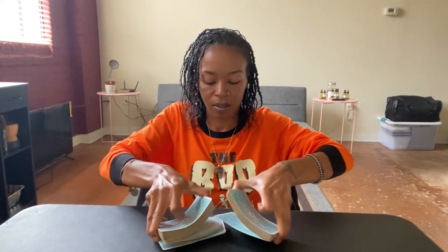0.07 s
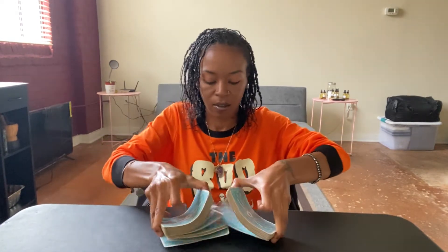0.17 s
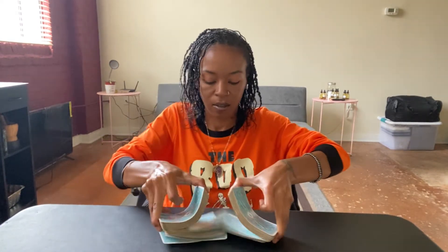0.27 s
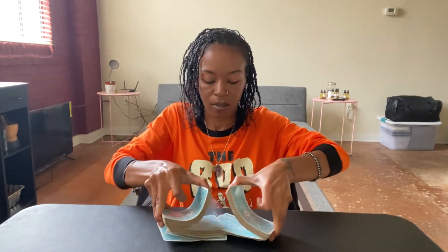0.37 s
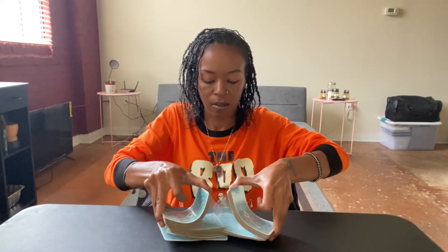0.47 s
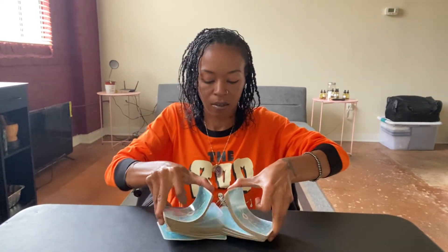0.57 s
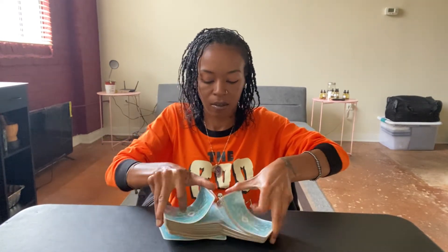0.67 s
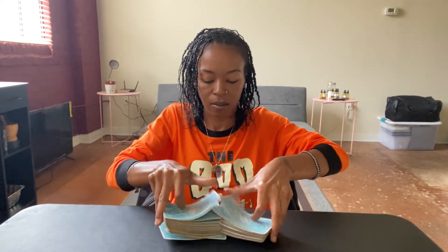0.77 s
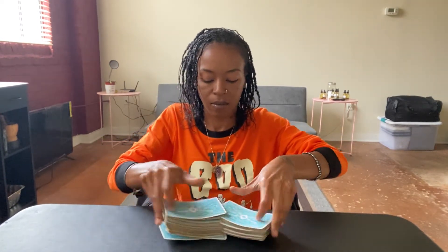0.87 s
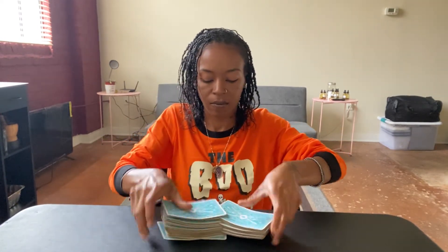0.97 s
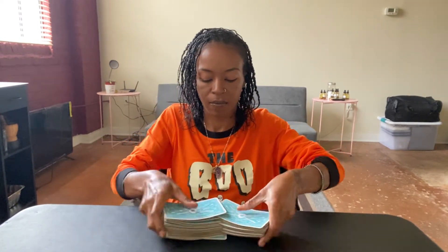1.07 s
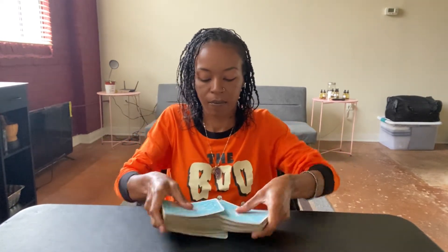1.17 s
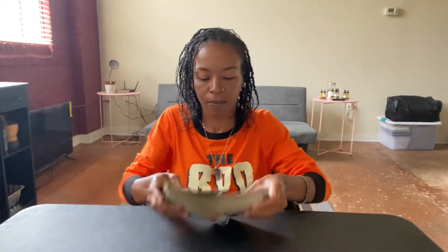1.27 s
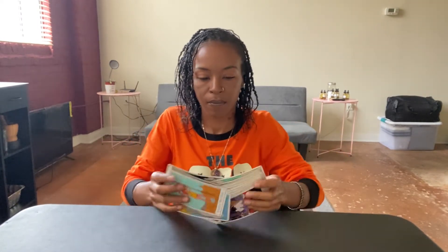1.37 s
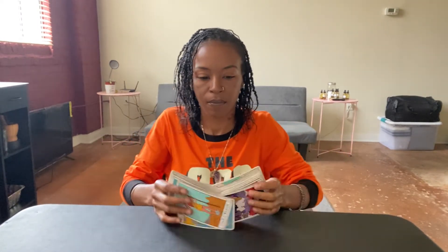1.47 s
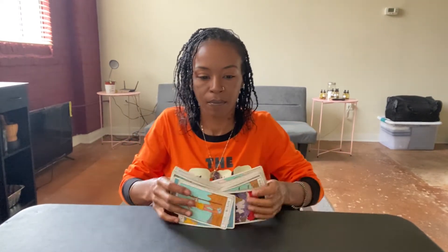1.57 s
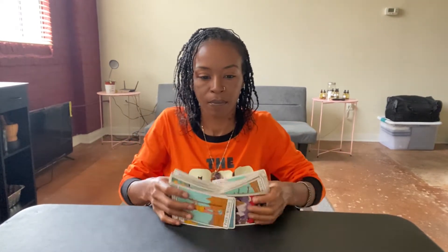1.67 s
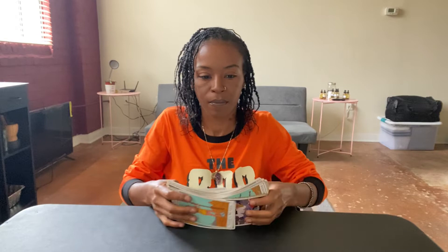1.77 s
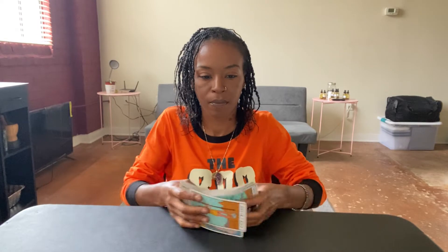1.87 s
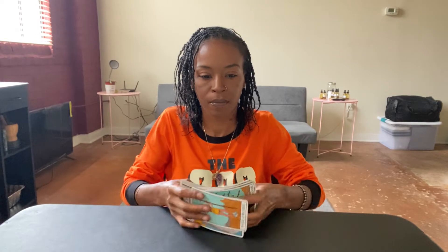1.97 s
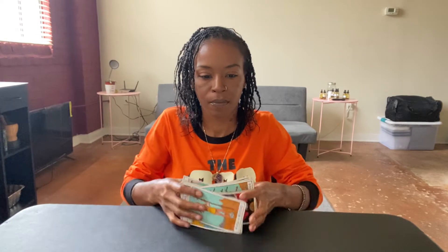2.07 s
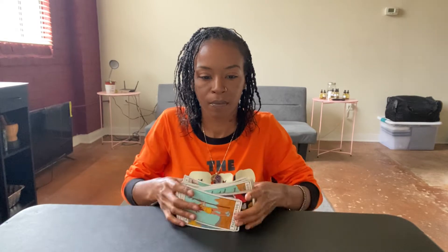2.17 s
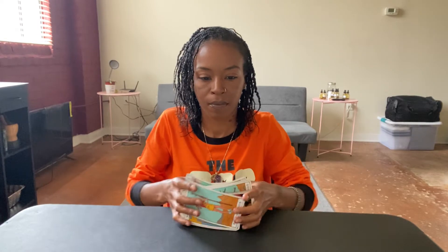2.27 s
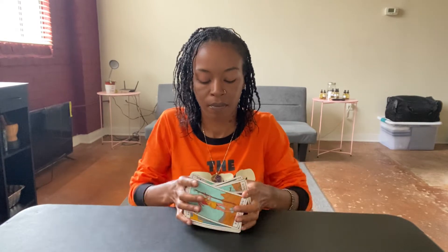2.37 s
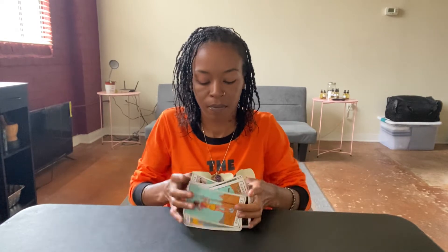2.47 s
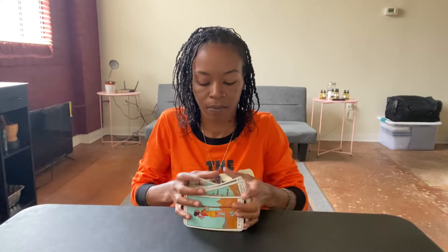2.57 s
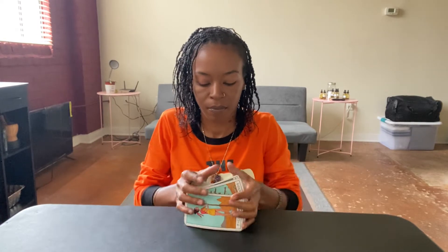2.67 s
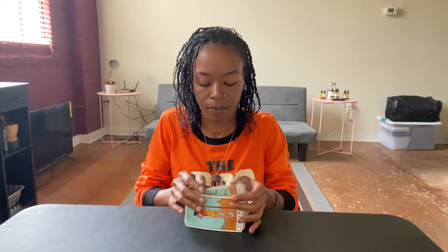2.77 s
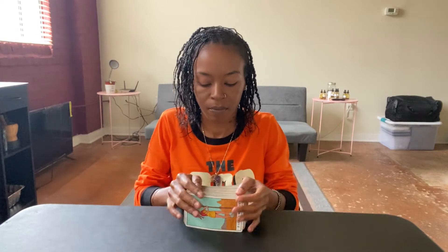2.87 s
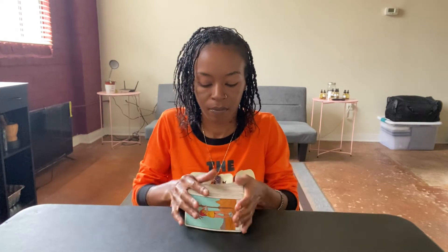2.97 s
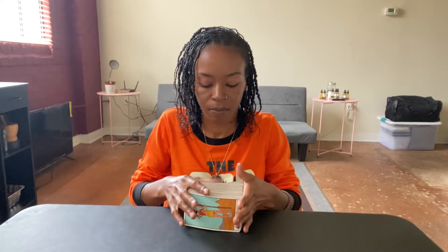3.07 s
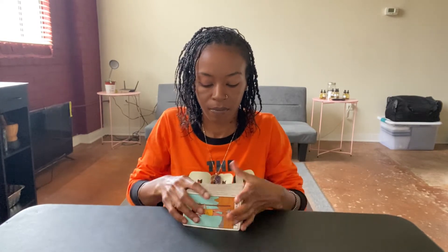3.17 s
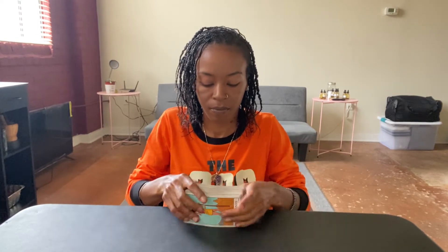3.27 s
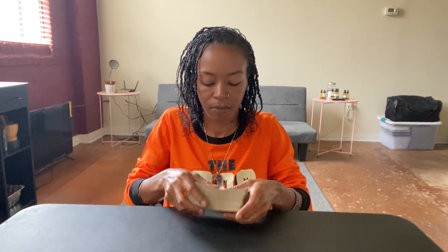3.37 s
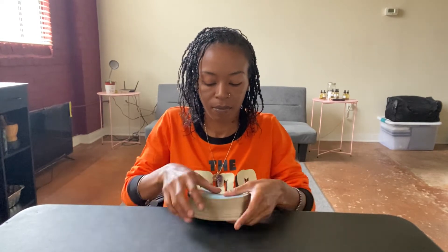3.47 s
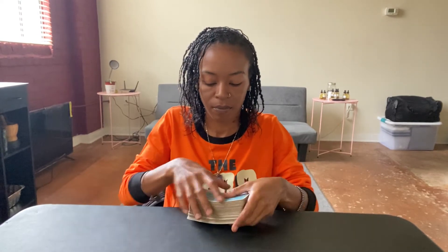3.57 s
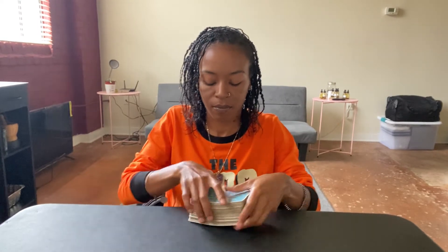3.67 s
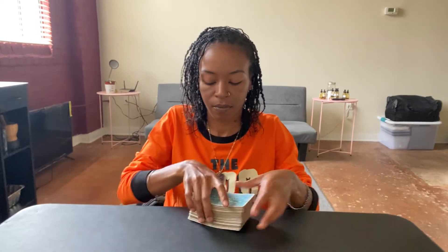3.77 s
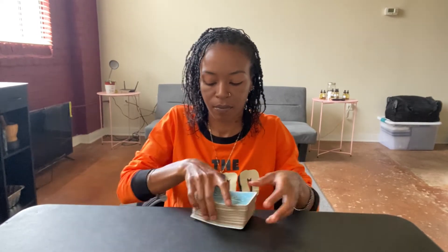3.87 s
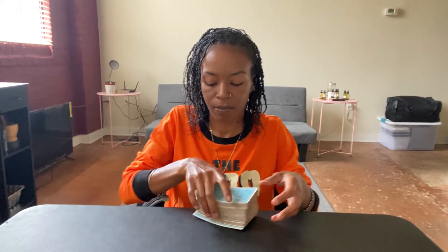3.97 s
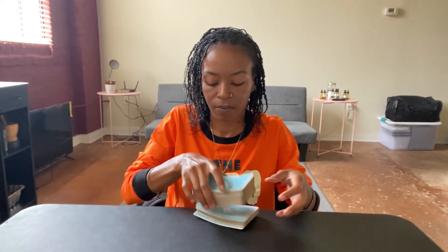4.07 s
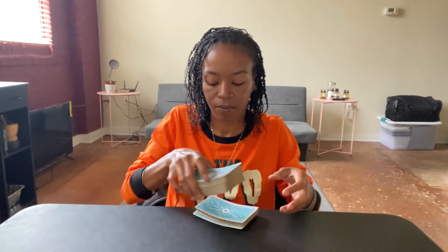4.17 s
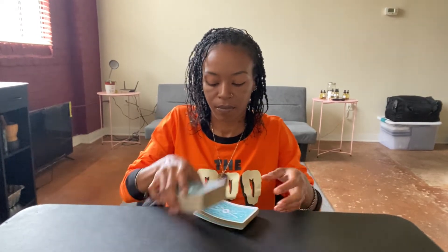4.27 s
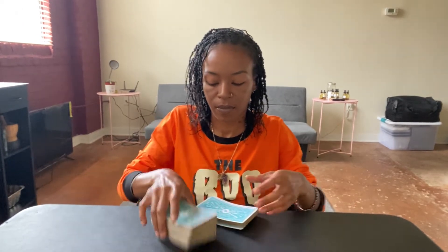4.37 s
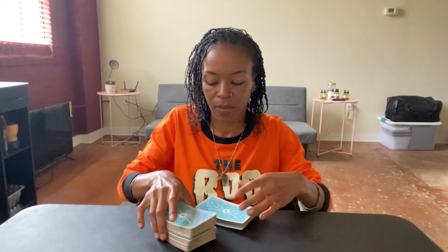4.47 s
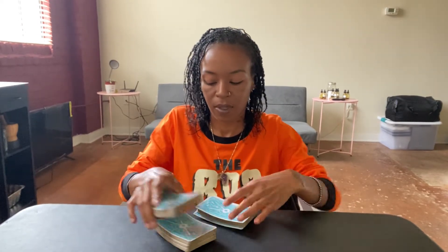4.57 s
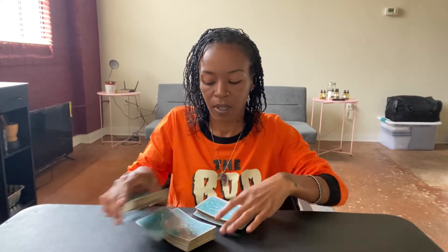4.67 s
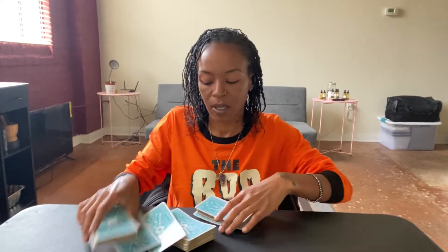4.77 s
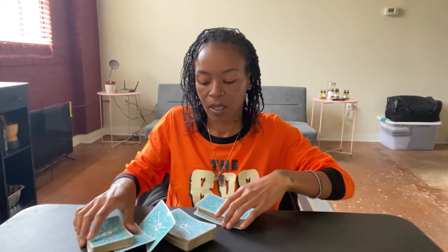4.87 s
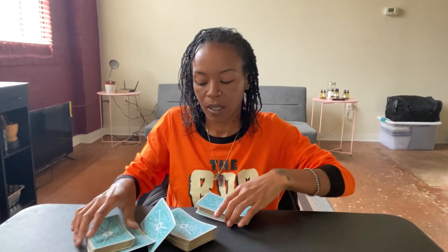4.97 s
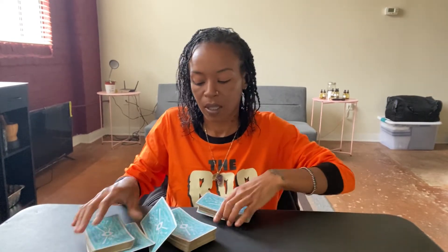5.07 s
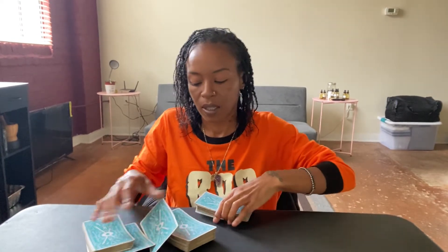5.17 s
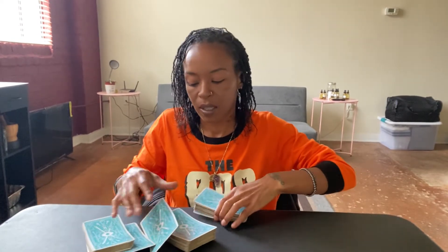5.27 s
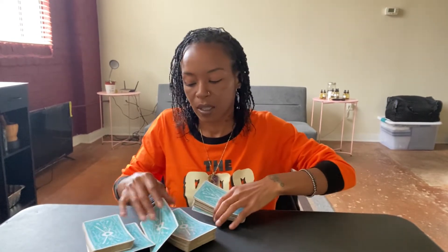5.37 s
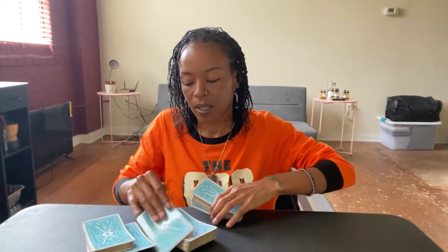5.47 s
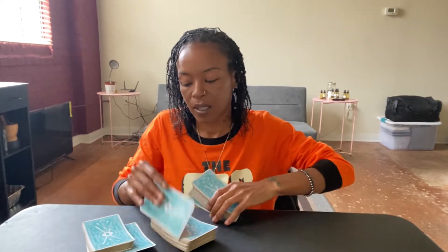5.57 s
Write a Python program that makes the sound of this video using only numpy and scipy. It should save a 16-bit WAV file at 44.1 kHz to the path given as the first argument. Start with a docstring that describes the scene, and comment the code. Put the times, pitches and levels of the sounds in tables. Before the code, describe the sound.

A close, crisp card riffle ends in a thud, followed by clustered woody deck taps, faint sliding and a few soft pile drops.

```python
"""Stiff cards are riffled onto a padded folding table, pushed together on edge, then cut into piles.
Each snap sums a decaying resonance of the half-closed deck's air pocket near 1 kHz with noise bursts
for the flexing cards and cracking edges; sliding is noise broken into slips, shaped by the same parts.
Pushes ring the modes of the table top. A bare room answers with decaying noise tails, over room noise
and a low motor hum, all heard by a small pair of microphones on the table."""
import sys
import numpy as np
from scipy import signal
from scipy.fft import rfft, irfft
from scipy.io import wavfile
from scipy.ndimage import uniform_filter1d

SR = 44100
rng = np.random.default_rng(int(sys.argv[2]) if len(sys.argv) > 2 else 0)


def store_wav(level_fs):
    """Save 16-bit WAV to argv[1]."""
    pcm = np.round(np.clip(np.atleast_2d(level_fs), -1, 1) * 32767)
    wavfile.write(sys.argv[1], SR, pcm.T.astype(np.int16))


def to_linear_factor(level_db):
    """Convert decibel levels (scalar or array-like) to linear amplitude factors."""
    exponent = np.asarray(level_db, float) / 20
    return 10 ** exponent


N = 247266
HZ = np.fft.rfftfreq(N, 1 / SR)

# Spectrum of the room noise. Each row: frequency in Hz, relative level in dB.
AIR_SPECTRUM = [(36, 13.5), (58, -4), (95, 8.5), (206, -7), (480, -8.5), (1960, -36), (6600, -42.5),
                (11600, -36.5), (14000, -47.5)]
# Decay of the room. Each row: frequency in Hz, time to fall 60 dB in seconds.
ROOM_DECAY = [(100, 0.3), (260, 0.63), (700, 0.79), (1840, 0.9), (4850, 0.95), (12000, 0.39)]
# Diffuse sound at the two ports. Each row: frequency in Hz, left-right likeness from 0 to 1.
DIFFUSE_LIKENESS = [(200, 0.57), (500, 0.04)]
# Phase between the ports. Each row: frequency in Hz, lead of the left port in radians.
PORT_LEAD = [(0, 0), (3000, -.7), (5200, -2.4), (7900, 0), (10550, np.pi), (13050, 2 * np.pi),
             (15200, 3 * np.pi)]
# Balance of the ports. Each row: frequency in Hz, left minus right in dB.
PORT_BALANCE = [(2500, 1.4), (5000, -0.9)]
# Modes of the table top. Each row: frequency in Hz, relative level in dB,
# time to fall 60 dB in seconds before any further damping.
TABLE_MODES = [(74.5, 8, 0.083), (107.8, 0, 0.12), (131.1, -2, 0.13), (153.1, -5, 0.4), (184.4, 0, 0.077),
               (235, -5.5, 0.026), (358.8, -6, 0.57), (420, 1.5, 0.087), (476.4, -2, 0.079),
               (546.3, -7, 0.19), (769, -6.5, 0.024)]
# Blows of the deck on the table top. Each row: time in seconds, level of the low modes in dB,
# upper modes in dB against that level.
THUMPS = [(1.025, -7, -22), (1.464, -14.5, 6.5), (1.699, -24, 7), (1.766, -40, 6), (2.015, -25, -4.5),
          (2.07, -28.5, -20), (2.128, -27, 10.5), (2.452, -20.5, 8.5), (2.55, -30.5, 12),
          (3.245, -30.5, -4), (3.28, -32, -15.5), (3.328, -41, 11), (3.356, -44.5, 16), (3.433, -44, 7.5),
          (3.499, -29, -13), (4.422, -7.5, -5), (4.709, -23, -49), (4.777, -27, -7), (4.826, -15, -29),
          (4.841, -11.5, -6.5)]
# Resonances of the air pocket. Each row: frequency in Hz, width in Hz, relative level in dB.
POCKET_PEAKS = [(480, 750, 5), (1020, 120, 1.5), (1860, 410, -23.5)]
# Resonances of a scuffed card. Each row: frequency in Hz, width in Hz, relative level in dB.
SCUFF_PEAKS = [(966, 180, -0.5), (1320, 44, -8), (1855, 170, -10), (3200, 110, -31), (4390, 190, -21)]
# Spectrum of thin paper edges. Each row: frequency in Hz, relative level in dB.
EDGE_SPECTRUM = [(1500, 5.5), (4000, -1), (6000, -3.5), (8500, -5.5), (10500, -10), (13000, -13.5),
                 (15000, -22.5), (16500, -38.5)]
# Extra brightness of thin edges in flicks, knocks and the riffle stream.
# Each row: frequency in Hz, gain in dB.
THIN_EDGE = [(8000, -2), (13000, 4.5)]
# Spectrum of whole cards flexing. Each row: frequency in Hz, relative level in dB.
FACE_SPECTRUM = [(900, -3), (1800, 5.5), (2600, -4.5), (3400, -6), (4400, -5.5), (6000, -18),
                 (10000, -47.5)]
# Cards sliding over each other. Each row: start in seconds, length in seconds, level in dB,
# how far the deck is fanned open from 0 to 1.
SLIDES = [(1.039, 0.12, -34, 0.68), (1.446, 0.13, -33, 0.23), (1.715, 0.11, -27, 0.33),
          (1.831, 0.16, -43.5, 0.66), (2.05, 0.14, -36, 0.04), (2.275, 0.094, -36.5, 0.39),
          (2.445, 0.15, -31, 0.36), (2.574, 0.19, -36.5, 0.57), (2.78, 0.096, -43, 0.46),
          (2.916, 0.23, -48.5, 0.37), (3.183, 0.27, -53, 0.76), (3.335, 0.041, -38.5, 0.44),
          (3.652, 0.12, -56, 0.69), (4.407, 0.15, -37.5, 0.26), (4.765, 0.15, -40, 0.73),
          (5.443, 0.39, -58, 0.59)]
# Layers of a slide in a shut and in an open deck: edge hiss, card faces, air pocket, in dB against its level.
SHUT_LAYERS_DB = (-37, -26, 3.3)
OPEN_LAYERS_DB = (9, 0.5, -3)
# Short coloured scuffs, perhaps a card dragged on the vinyl.
# Each row: start in seconds, length in seconds, level in dB.
SCUFFS = [(3.212, 0.043, -41), (3.34, 0.023, -56), (3.653, 0.059, -45.5), (5.561, 0.024, -43)]
# Stream of cards between the thumbs. Each row: time in seconds, level in dB.
RIFFLE = [(0.08, -55.5), (0.158, -59), (0.27, -40.5), (0.345, -65.5), (0.375, -36), (0.5, -38.5),
          (0.54, -35), (0.7, -36), (0.76, -36), (0.86, -70)]
# Layers of the stream: edge hiss, card faces, air pocket, in dB against its level.
STREAM_LAYERS_DB = (-8, -6, -4)
# Cards let go by the thumbs, each falling flat on the pile. Each row: time in seconds,
# level of the pop in dB, crack setting in dB against the pop (snap() raises it).
FLICKS = [(0.105, -25.5, -11.5), (0.154, -28.5, -20), (0.208, -31, -19), (0.233, -43.5, 2.5),
          (0.359, -29.5, -2), (0.375, -34, -6), (0.408, -34.5, -2), (0.433, -25.5, -25.5),
          (0.481, -30.5, -10), (0.509, -16, -18.5), (0.529, -17, -13), (0.597, -15.5, -17),
          (0.602, -15, -14), (0.656, -14.5, -12), (0.664, -17.5, -14), (0.711, -12.5, -16.5),
          (0.744, -22, -25.5)]
# Cards knocked home in the deck. Each row: time in seconds, level of the pop in dB,
# pitch of the air pocket in Hz.
KNOCKS = [(1.461, -32, 776), (1.482, -21.5, 750), (1.645, -19, 870), (1.701, -16.5, 1160),
          (1.701, -13.5, 519), (1.736, -10, 1130), (1.739, -14, 540), (1.74, -8, 1110), (1.768, -23, 950),
          (2.065, -26.5, 990), (2.105, -24.5, 940), (2.131, -22, 950), (2.27, -19.5, 1110),
          (2.291, -12, 1030), (2.407, -12, 1030), (2.441, -19, 1055), (2.457, -9.5, 860),
          (2.463, -13, 1070), (2.467, -3, 1090), (2.494, -20, 1220), (2.523, -16, 960), (2.548, -4, 1120),
          (2.555, -12, 783), (2.578, -14.5, 1133), (2.612, -8, 1050), (2.617, -16, 1000),
          (2.666, -20.5, 1090), (2.677, -14, 1116), (2.695, -20.5, 1180), (2.843, -26.5, 910),
          (2.996, -26.5, 1020), (3.011, -14.5, 1020), (4.421, -18.5, 800), (5.575, -35.5, 1160)]
# Short bright ticks, mostly bare card corners. Each row: time in seconds, reference level in dB,
# lowest strong frequency in Hz.
TICKS = [(0.533, -23, 5000), (0.6, -20, 5000), (0.657, -14, 12100), (0.723, -23, 4200), (0.805, -33, 7000),
         (1.482, -32.5, 1500), (1.699, -24.5, 1780), (2.018, -40.5, 2940), (2.067, -34.5, 1770),
         (2.457, -28, 3200), (2.548, -29, 3400), (2.615, -28.5, 3270), (3.173, -40, 3080),
         (3.497, -46.5, 1985), (4.413, -29, 1210), (4.422, -26, 2000), (4.605, -44, 8600),
         (4.741, -40, 1990), (4.774, -19, 4270), (4.786, -27, 6000), (4.796, -25.5, 1700),
         (4.839, -43.5, 4950), (4.808, -28, 1710)]


def evened(x):
    """Normalization of power: scales to rms 1."""
    return x / np.sqrt(np.mean(x ** 2) + 1e-20)


def peaked(x):
    """Normalization of amplitude: scales to peak 1."""
    return x / (abs(x).max() + 1e-12)


def read(points, hz):
    """Interpolation of a spectrum on a log-frequency axis."""
    f, value = np.transpose(points)
    return np.interp(np.log(hz + 1), np.log(f + 1), value)


def add(mix, s, sound):
    """Superposition: adds a sound to the mix at time s."""
    part = mix[..., round(s * SR):][..., :sound.shape[-1]]
    part += sound[..., :part.shape[-1]]


def coloured(x, points):
    """Linear filtering: multiplies the spectrum of x by a curve held level beyond its end points."""
    gain = to_linear_factor(read(points, np.fft.rfftfreq(x.shape[-1], 1 / SR)))
    return irfft(rfft(x) * gain, x.shape[-1])


def resonated(x, rows):
    """Resonance: filters x by a sum of peaks of given centre, width and level."""
    gain = sum(to_linear_factor(db) / (1 + (2 * (HZ - hz) / width) ** 2) for hz, width, db in rows)
    return irfft(rfft(x) * gain, N)


def paired(x):
    """Spatial coherence: makes two unrelated channels as alike as diffuse sound at the two ports."""
    left, other = rfft(x)
    same = read(DIFFUSE_LIKENESS, HZ)
    return irfft(np.array([left, same * left + np.sqrt(1 - same ** 2) * other]), N)


def slow_drift(samples):
    """Random drift: noise averaged twice over a window, scaled to rms 1."""
    once = uniform_filter1d(rng.standard_normal(N), samples)
    return evened(uniform_filter1d(once, samples))


def background():
    """Stationary noise and a tone: diffuse room noise, and a motor hum whose level wavers a little."""
    air_db, hum_db, hum_hz = -43.5, -36.5, 57.67  # rms levels ahead of the microphones
    air = to_linear_factor(air_db) * evened(paired(coloured(rng.standard_normal((2, N)), AIR_SPECTRUM)))
    hum_level = to_linear_factor(hum_db + 0.67 * slow_drift(6000))
    hum = hum_level * np.sqrt(2) * np.sin(2 * np.pi * (hum_hz * np.arange(N) / SR + rng.random()))
    return air + hum


def room(x):
    """Diffuse reverberation: noise tails build up after the first walls, each band dying at its own speed."""
    half_turns_per_s, first_wall_s, build_s = 9, 0.012, 0.0091
    hz, t, z = signal.stft(rng.standard_normal((3, 2, SR)), SR, nperseg=256)
    decay = to_linear_factor(-60 * t / read(ROOM_DECAY, hz)[:, None])
    z = z * decay * np.clip((t - first_wall_s) / build_s, 0, 1)
    tail = signal.istft(z, SR, nperseg=256)[1]
    tail = tail / np.linalg.norm(tail[0, 0])
    # three random pairs of tails take turns at a steady rate, so no chance peak lingers
    phase = half_turns_per_s * np.arange(N) / SR + np.arange(3)[:, None] / 3
    turn = np.cos(np.pi * phase) * np.sqrt(2 / 3)
    echoes = signal.fftconvolve((turn * x)[:, None], tail, axes=2)[..., :N]
    return paired(echoes.sum(0))


def table_ring(upper):
    """Modal vibration: the modes of the table top above or up to 300 Hz ring and decay after one tick."""
    t = np.arange(SR // 2) / SR
    modes = [row for row in TABLE_MODES if (row[0] > 300) == upper]
    return sum(to_linear_factor(db - 60 * t / t60) * np.sin(2 * np.pi * hz * t) for hz, db, t60 in modes)


def thump(low_ring, upper_ring, push_s):
    """Forced vibration: a padded push rings the low modes, the first contact rings the upper ones."""
    bounce_hz, bounce_start_hz, bounce = 90.3, 278.3, 0.17
    t, noise = np.arange(3000) / SR, rng.standard_normal((3, 3000))
    u = t / push_s
    # air squeezed under the deck: its pitch falls during the push
    pitch = bounce_hz + (bounce_start_hz - bounce_hz) * np.exp(-2 * u)
    squeeze = bounce * np.sin(2 * np.pi * np.cumsum(pitch) / SR)
    padding = signal.butter(3, 380, fs=SR)
    push = signal.lfilter(*padding, (noise[0] + squeeze) * u * np.exp(-u ** 2))
    contact = (noise[0] + 1.07 * noise[1:]) * t * np.exp(-t / 0.0014)
    low = peaked(signal.fftconvolve(push, low_ring))
    upper = peaked(signal.fftconvolve(contact, upper_ring[None], axes=1))
    since_push = np.arange(len(low)) / SR - 3 * push_s
    low = low * np.minimum(1, np.exp(-since_push / 0.061))  # hands damp the top
    return low, upper * np.exp(-np.arange(upper.shape[1]) / SR / 0.11)


def thumps(cards):
    """Impact excitation: the deck's blows, and each released card's fall, ring the table top."""
    push_s, edge_push_s = 0.01966, 0.013  # a deck landing on edge rings the upper modes, pushes briefly
    land_s, land_db, land_upper_db, land_push_s = 0.0051, 3.5, -11, 0.015
    blows = [(*row, edge_push_s if row[2] > 0 else push_s) for row in THUMPS]
    blows += [(s + land_s, db + land_db, land_upper_db, land_push_s) for s, db, _ in cards]
    out = np.zeros((2, N))
    low_ring, upper_ring = table_ring(False), table_ring(True)
    for s, db, upper_db, length in blows:
        low, upper = thump(low_ring, upper_ring, length)
        add(out, s - .004, to_linear_factor(db) * low)
        add(out, s - .001, to_linear_factor(db + upper_db) * upper)
    return out


def riffle_db(s):
    """Envelope of a stream: its level in dB at time s, next to silent outside the riffle."""
    return np.interp(s, *np.transpose(RIFFLE), left=-120, right=-120)


def swell(length):
    """Envelope of a stroke: swells fast, fades slower."""
    return np.sin(np.pi * np.linspace(0, 1, round(length * SR)) ** 0.52) ** 1.23


def rub():
    """Stick-slip friction: three noises share a steady grip broken by small random slips."""
    slips_per_s, spread_db, slip_s, steady_grip = 160, 3.5, .002, 0.92
    sizes = to_linear_factor(spread_db * np.minimum(rng.exponential(1, N), 2))
    slips = sizes * (rng.random(N) < slips_per_s / SR)
    grip = steady_grip + signal.lfilter([1], [1, -np.exp(-1 / (slip_s * SR))], slips)
    return grip * rng.standard_normal((3, N))


def drifting_pocket(sides):
    """Cavity resonance: the pocket's pitch drifts as the gap between the halves changes."""
    wander = .12  # share of the pitch per unit of drift
    ringing = resonated(sides, POCKET_PEAKS)
    # reading at a varying speed bends the pitch
    read_at = np.cumsum(1 + wander * np.clip(slow_drift(1500), -2, 2)) % (N - 1)
    return np.array([np.interp(read_at, np.arange(N), side) for side in ringing])


def slide():
    """Friction-driven radiation: rubbing feeds paper hiss, card faces, air pocket, scuffs and table."""
    stream = to_linear_factor(riffle_db(np.arange(N) / SR) + np.array(STREAM_LAYERS_DB)[:, None])
    pressure, drag = np.zeros((3, N)), np.zeros(N)
    for s, length, db, fanned in SLIDES:
        layers_db = db + np.array(SHUT_LAYERS_DB) + fanned * np.subtract(OPEN_LAYERS_DB, SHUT_LAYERS_DB)
        add(pressure, s, to_linear_factor(layers_db)[:, None] * swell(length))
    for s, length, db in SCUFFS:
        add(drag, s, to_linear_factor(db) * swell(length))
    rubbing = rub()
    sides = rubbing[2] + 2.36 * rubbing[:2]  # left and right share one noise
    both = pressure + stream
    paper = coloured(sides, EDGE_SPECTRUM)
    hiss = pressure[0] * evened(paper) + stream[0] * evened(coloured(paper, THIN_EDGE))
    faces = both[1] * evened(coloured(sides, FACE_SPECTRUM))
    pops = both[2] * evened(drifting_pocket(sides))
    scuffs = drag * evened(resonated(sides, SCUFF_PEAKS))
    ring = table_ring(False)
    rumble = to_linear_factor(-7) * signal.oaconvolve(both[2] * rubbing[2], ring / np.linalg.norm(ring))[:N]
    return hiss + faces + pops + scuffs + rumble


def released():
    """Random arrivals: rows (s, level dB, crack dB) of the loud released cards and a flutter of small ones."""
    flutter_per_s, flutter_db, spread_db, crack_db = 85, 1.5, 5, -10
    start, end = RIFFLE[0][0], RIFFLE[-1][0]
    draw = rng.random((200, 2))
    times = start + np.cumsum(-np.log(1 - draw[:, 0])) / flutter_per_s
    levels = riffle_db(times) + flutter_db + spread_db * draw[:, 1] ** 2
    return FLICKS + [(s, db, crack_db) for s, db in zip(times, levels) if s < end]


def air_pop(t, hz, bounces):
    """Damped resonance: the pocket and its overtone sound for a few cycles with a soft start."""
    overtone, overtone_db = 1.733, -12.5
    pop = t ** 2 * np.exp(-t / .00062) * np.sin(2 * np.pi * hz * t)
    pop = pop + to_linear_factor(overtone_db) * t ** 2 * np.exp(-t / 0.00053) * np.sin(2 * np.pi * overtone * hz * t)
    near, far = bounces
    return peaked(pop - 0.3 * np.roll(pop, near) + 0.2 * np.roll(pop, far))


def snap(db, hz, crack_db, edge, pop_db=0):
    """Impulsive release: a pop of the air pocket, a flex of the cards and a crack of the paper edge."""
    t, noise = np.arange(1024) / SR, rng.standard_normal((2, 3, 1024))
    # bounces off table, hands and chest, in samples
    bounces = (np.array([150, 330]) + 40 * np.clip(noise[0, 0, :2], -2, 2)).astype(int)
    pop = air_pop(t, hz, bounces)
    sides = noise[:, 0] + 1.2 * noise[:, 1:].swapaxes(0, 1)  # not quite the same from left and right
    flex = peaked(coloured(sides[:, 0], FACE_SPECTRUM) * t * np.exp(-t / 0.0025))
    paper = coloured(coloured(sides[:, 1], EDGE_SPECTRUM), edge)
    crack = peaked(paper * t * np.exp(-t / .00045))
    flex_db = pop_db + 0.41 * crack_db + 3.0  # duller blows flex the cards less
    return to_linear_factor(db) * (to_linear_factor(pop_db) * pop + to_linear_factor(flex_db) * flex + to_linear_factor(crack_db + 17.5) * crack)


def snaps(cards):
    """Contrast of excitation: knocks are dull, released cards crack brightly, ticks have little pop."""
    flick_hz, flick_spread_hz, lead_s = 1087, 100, .0008
    out = np.zeros((2, N))
    for s, db, hz in KNOCKS:
        add(out, s - lead_s, snap(db, hz, -55.5, THIN_EDGE))
    for s, db, hz in TICKS:
        # a tick has little body an octave down and fades an octave up
        tick_edge = [(hz / 2, -21), (hz, 0), (2 * hz, -9)]
        add(out, s - lead_s, snap(db, flick_hz, -15.5, tick_edge, pop_db=-26.5))
    for s, db, crack_db in cards:
        hz = flick_hz + flick_spread_hz * rng.standard_normal()
        add(out, s - lead_s, snap(db, hz, crack_db, THIN_EDGE))
    return out


def scene():
    """Superposition of direct and reflected sound: cards and table close by, echo and background."""
    steady, rubbing, released_cards = background(), slide(), released()
    cards = rubbing + snaps(released_cards) + thumps(released_cards)
    echo = to_linear_factor(-8.0) * room(cards[0])
    return cards + echo + steady


def roll_off(x):
    """The treble ends steeply here."""
    return signal.sosfilt(signal.butter(12, 16660, fs=SR, output="sos"), x)


def record(dry):
    """Two-port pickup: the bass rolls off, and nearly all the treble comes from one port with a phase twist."""
    left, right = rfft(dry) / (1 + (50 / (HZ + 1)) ** 7)
    shared = np.clip((HZ - 6200) / 1700, 0, .96)
    right = shared * left + (1 - shared) * right
    f, lead = np.transpose(PORT_LEAD)
    # half of the lead and of the balance goes to each port
    half = np.exp(.5j * np.interp(HZ, f, lead)) * to_linear_factor(read(PORT_BALANCE, HZ) / 2)
    ports = irfft(np.array([left * half, right / half]), N)
    return roll_off(ports)


dry = scene()
out = record(dry)
store_wav(out)
```